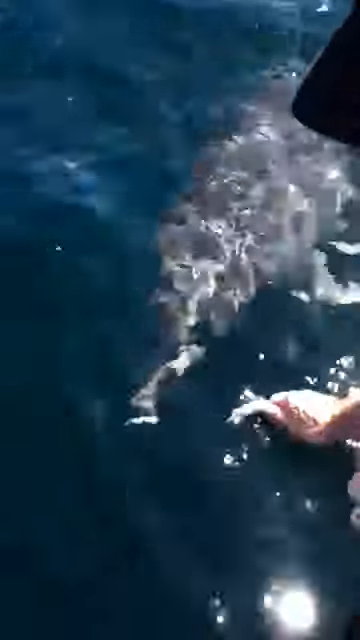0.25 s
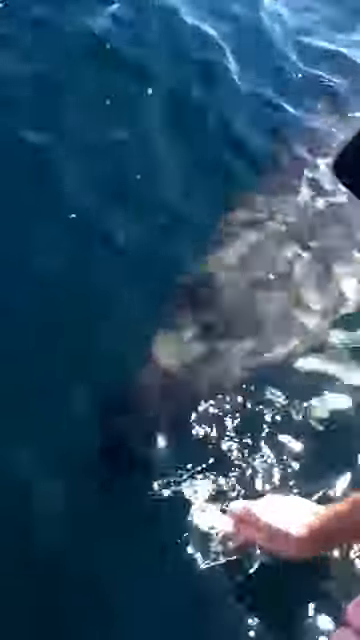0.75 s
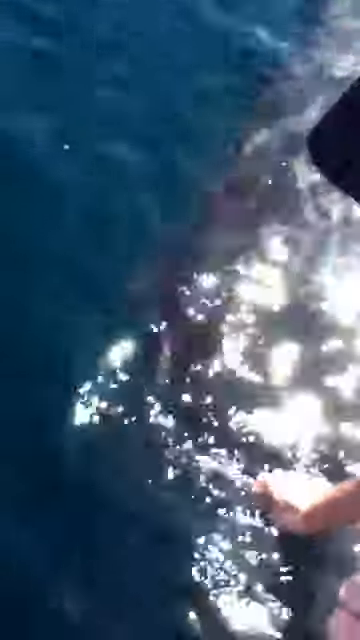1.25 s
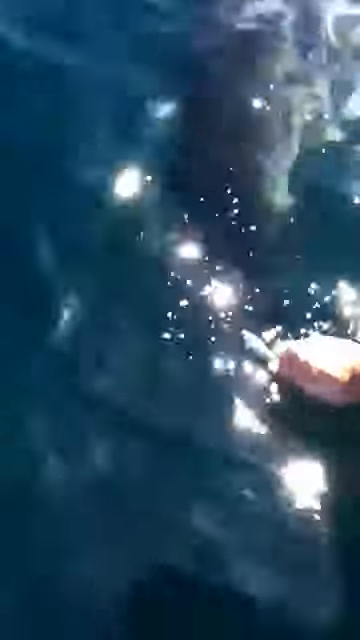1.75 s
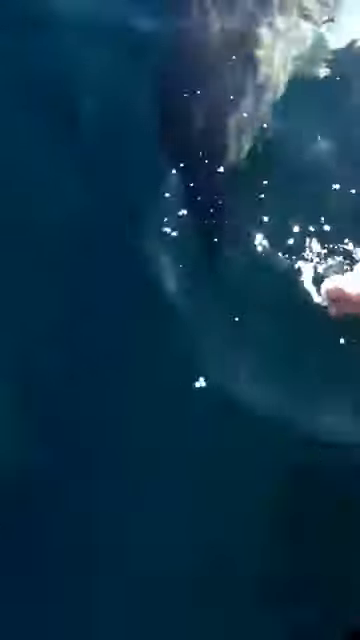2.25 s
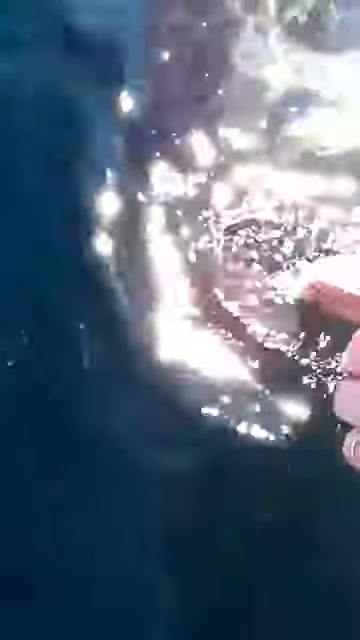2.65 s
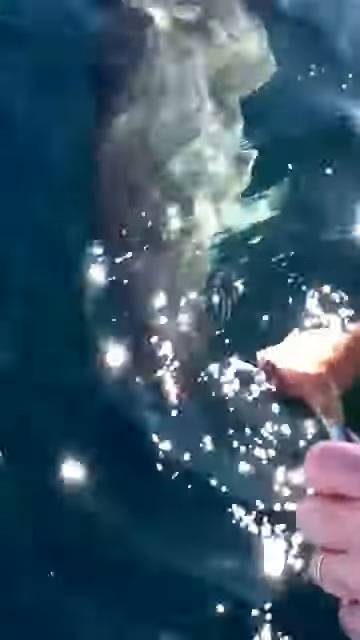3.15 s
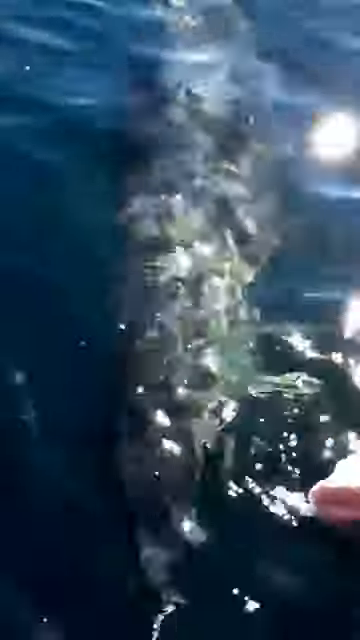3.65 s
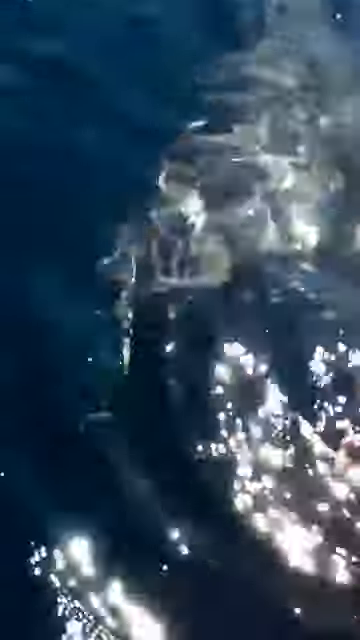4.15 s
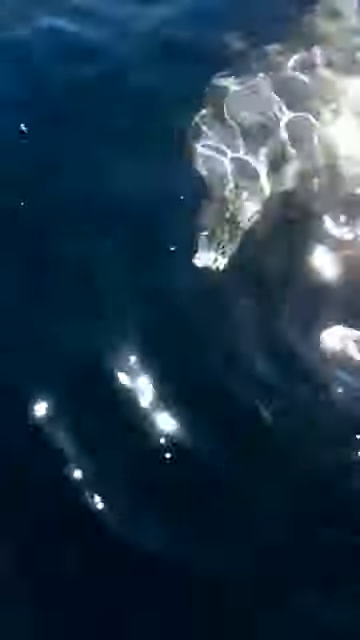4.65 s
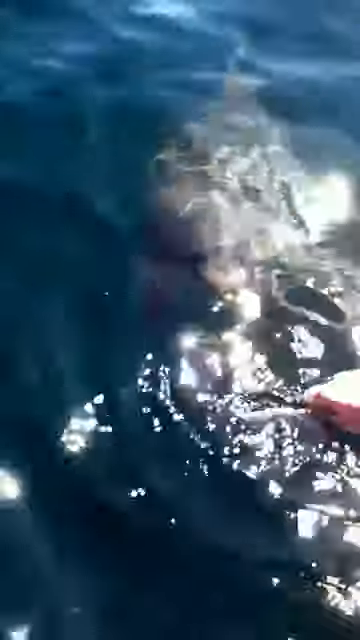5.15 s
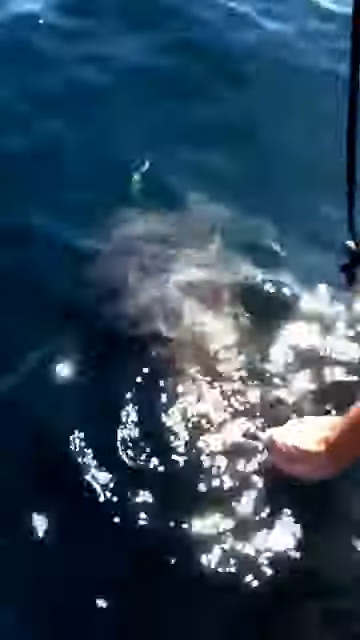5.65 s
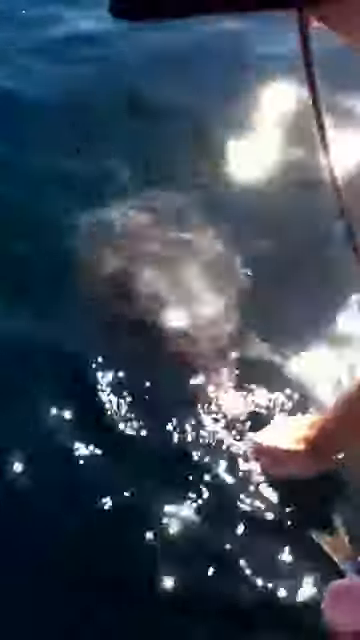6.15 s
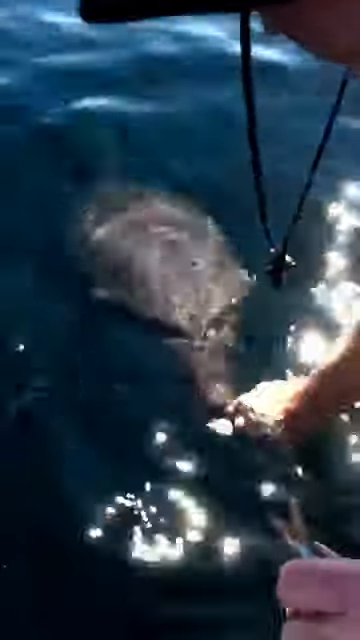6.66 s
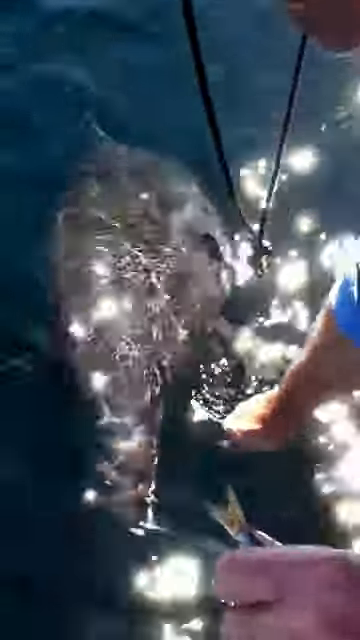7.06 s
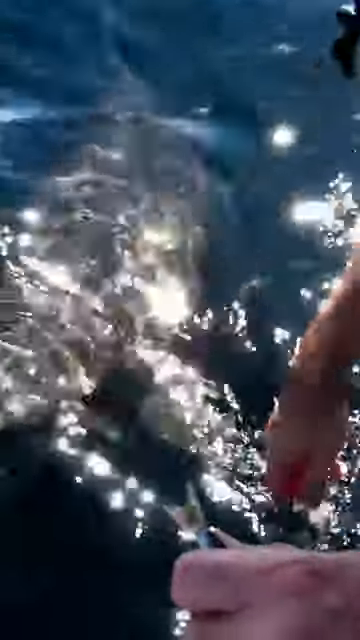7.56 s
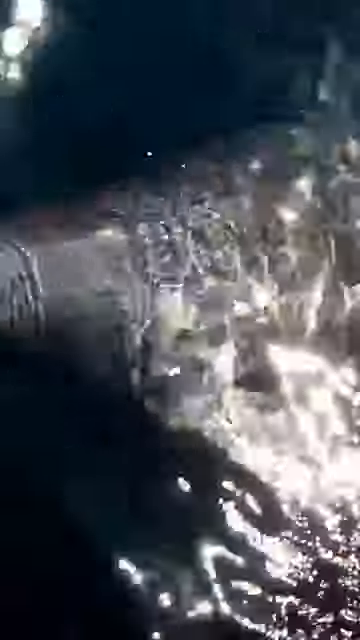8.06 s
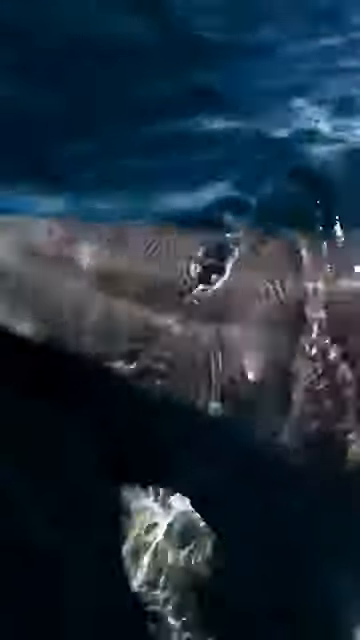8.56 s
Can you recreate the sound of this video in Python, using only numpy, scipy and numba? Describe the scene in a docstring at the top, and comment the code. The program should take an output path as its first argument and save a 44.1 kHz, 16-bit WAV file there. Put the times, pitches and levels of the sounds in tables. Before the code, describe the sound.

Small waves lap and slap softly against a boat hull, with gurgling bubbles, ticking drops and faint hiss in open air.

```python
"""Small waves against a boat

Waves lap the side of a boat, heard from a phone held over the rail. Slaps drive noise into air pockets
and damped hull modes; single bubbles are gliding tones amid froth, and drops tick as brief damped sines.
Swarms of random bubbles gurgle and crackle with each surge of water.
Shaped noise and a faint sine hiss softly underneath."""
import sys
import numpy as np
from scipy import signal
from scipy.fft import rfft, irfft
from scipy.io import wavfile
from scipy.ndimage import uniform_filter1d
from numba import njit

SR = 44100
rng = np.random.default_rng(int(sys.argv[2]) if len(sys.argv) > 2 else 0)


def put_to_file(sound):
    """Save the sound as 16-bit audio at rate SR, in the file named by the first command-line argument."""
    columns = np.atleast_2d(sound).T  # one column per channel
    safe = np.clip(columns, -1, 1)
    whole_steps = np.round(safe * 32767)
    wavfile.write(sys.argv[1], SR, whole_steps.astype(np.int16))


N = 388069
TIME = np.arange(N) / SR


def undb(db):
    """Decibel law: 20 dB is a tenfold amplitude."""
    return 10 ** (np.asarray(db) / 20)


def level(x, db):
    """Root-mean-square normalization to a level in dB."""
    return x * undb(db) / np.sqrt(np.mean(x ** 2))


def band(x, lo_hz, hi_hz):
    """Band-pass filtering: only the partials between two cutoffs pass freely."""
    sos = signal.butter(2, [lo_hz, min(hi_hz, 0.45 * SR)], "band", fs=SR, output="sos")
    return signal.sosfilt(sos, x)


def add(out, start_s, x):
    """Linear superposition: mix x into out from a given time."""
    i = int(start_s * SR)
    out[i:i + len(x)] += x[:N - i]


def burst(t60, attack_s):
    """Exponential decay: noise that rises quickly and falls by 60 dB in t60 seconds."""
    t = np.arange(int(SR * t60) + 64) / SR
    noise = rng.standard_normal(SR)[:len(t)]
    return noise * (1 - np.exp(-t / attack_s)) * 1000.0 ** (-t / t60) / 2


@njit
def rings(n, sr, start, hz, t60, rise, attack, size):
    """Damped free oscillation: sines that glide by `rise` octaves while they fade by 60 dB."""
    y = np.zeros(n)
    for k in range(len(start)):
        first, steps = int(start[k] * sr), int(t60[k] * sr) + 1
        w = 2 * np.pi * hz[k] / sr
        # a complex phasor turns and shrinks at each sample; glide quickens the turn
        turn = np.exp(1j * w - np.log(1000.0) / steps)
        glide = np.exp(1j * w * (2.0 ** rise[k] - 1) / steps)
        ease = np.exp(-1.0 / (attack[k] * sr + 1e-9))
        z, soft = size[k] + 0j, 1.0
        for i in range(max(first, 0), min(first + steps, n)):
            z, turn, soft = z * turn, turn * glide, soft * ease
            y[i] += (1 - soft) * z.imag
    return y


# air pocket and hull settings: levels against the slap, before filtering
POCKET_TAIL_DB, HULL_DB = 8, -37.5
# resonant modes of the hull: (frequency [Hz], level [dB], t60 [s])
HULL_MODES = [(166, -12, 0.28), (218, 1, 0.16), (328, -5.5, 0.15), (634, 10.5, 0.0093)]
# waves that slap the hull:
# (time [s], level [dB], air pocket frequency [Hz], t60 [s], splash level against the slap [dB])
HULL_SLAPS = [(0.004, -34, 393, 0.17, -17), (0.192, -38, 336, 0.64, -16), (0.521, -36, 218, 0.22, -14),
              (0.822, -43, 333, 0.35, -15), (1.388, -19, 176, 0.088, -8.5), (1.454, -25, 308, 0.17, -9),
              (1.997, -29, 295, 0.19, -21), (2.67, -35, 210, 0.48, -9), (3.186, -33.5, 220, 0.16, -10),
              (3.86, -35.5, 330, 0.93, -12), (4.286, -40, 210, 0.61, -24), (5.189, -50, 420, 0.93, -21),
              (5.669, -29, 185, 0.21, -15), (6.369, -31, 149, 0.3, -12), (6.446, -15.5, 220, 0.14, -13.5),
              (6.529, -28.5, 190, 0.27, -13), (6.869, -35.5, 251, 0.55, -15), (7.155, -35, 317, 0.046, -5),
              (7.247, -34, 212, 0.045, -12), (7.538, -31, 264, 0.17, -26), (8.211, -34, 295, 0.18, -8),
              (8.245, -46.5, 389, 0.9, -18)]


def slaps():
    """Impulsive excitation: a slap sets an air pocket murmuring, shakes the hull and throws a splash."""
    out, push = np.zeros(N), np.zeros(N)
    for start, db, hz, t60, splash_db in HULL_SLAPS:
        add(push, start, undb(db) * burst(t60, 0.00012))
        pocket = band(burst(t60, 0.02), hz / 1.02, hz * 1.43)
        add(out, start, undb(db + POCKET_TAIL_DB) * pocket)
        splash = band(burst(0.7 * t60, 0.00025), 230, 3170)
        add(out, start, undb(db + splash_db) * splash)
    # the push convolved with the hull's impulse response
    t = np.arange(SR // 4) / SR
    hull = sum(undb(db) * np.sin(2 * np.pi * hz * t) * 1000.0 ** (-t / t60) for hz, db, t60 in HULL_MODES)
    return out + undb(HULL_DB) * signal.fftconvolve(push, hull)[:N]


FADE_DB, FADE_POWER = 9, 0.79  # drop after one fade time, curve of the fade
FROTH_DB = 16  # froth against the tone, before filtering and the swell factors
CLEAN_SWELL_S = 0.0037  # a bubble that starts quicker than this has less froth
PUFF_CYCLES = 12  # a bubble that takes more cycles than this to swell is lost in its froth
# single bubbles and air pockets:
# (time [s], level before the puff loss [dB], frequency at the peak [Hz], swell [ms], fade [ms], glide [octaves])
SINGLE_BUBBLES = [(0.002, -37.5, 407, 0.64, 6.6, 0.07), (0.07, -53.5, 376, 8.8, 34, 0.041),
                  (0.188, -43, 314, 17, 28, 0.087), (0.216, -44, 474, 4, 10, -0.14),
                  (0.237, -41, 397, 9, 15, -0.39), (0.39, -42, 735, 2.4, 15.4, -0.018),
                  (0.425, -50.5, 1090, 13.4, 15, 1.25), (0.5, -45, 990, 4, 3.7, 0.12),
                  (0.511, -38.5, 1506, 2.3, 3.4, -0.53), (0.518, -42.5, 231, 9.3, 15, 0.0019),
                  (0.52, -36, 885, 12.4, 3.1, -0.06), (0.531, -40, 1250, 2.5, 11, 0.0),
                  (0.547, -44, 910, 9.5, 19, 0.31), (0.584, -45.5, 771, 9.6, 21, 0.35),
                  (0.602, -43, 667, 13, 14, 0.3), (0.638, -35.5, 262, 8.3, 20, 0.15),
                  (0.648, -33, 538, 46, 9.4, 0.57), (0.724, -39.5, 726, 2.6, 6.9, 0.21),
                  (0.749, -44, 700, 2.5, 8.2, -0.14), (0.75, -49, 240, 5.4, 7.3, -0.24),
                  (0.81, -49, 727, 5.4, 9.1, 0.039), (0.82, -50, 347, 5, 11, -0.062),
                  (0.834, -42, 1330, 4.6, 4.3, -0.25), (0.854, -43, 2490, 0.8, 6, -0.025),
                  (0.948, -48.0, 511, 4.4, 18.5, 0.17), (0.959, -39, 985, 16, 3.6, -0.27),
                  (0.96, -43, 1826, 2.9, 3.9, 0.09), (0.969, -45, 2100, 6.0, 8.5, -0.045),
                  (0.973, -45.5, 526, 12, 8.9, 0.085), (0.993, -42, 2080, 4.0, 3.0, 0.17),
                  (0.996, -34.5, 1184, 2.5, 2, 0.12), (1.002, -40.5, 1314, 8.6, 9.1, 0.2),
                  (1.187, -46, 2010, 1.5, 3, 0), (1.193, -42, 2160, 2, 3.7, 0),
                  (1.203, -27, 2035, 0.9, 3, -0.059), (1.215, -44.5, 640, 2, 8.9, -0.0072),
                  (1.27, -54, 1100, 6, 6.4, -0.062), (1.321, -51, 2560, 3.5, 5.5, 0.17),
                  (1.387, -27.5, 345, 4, 14, -0.026), (1.387, -21.5, 184, 4, 11, -0.15),
                  (1.389, -44, 1740, 4.3, 5.9, 0.087), (1.395, -34, 716, 7.3, 6.7, -0.18),
                  (1.407, -54, 1430, 2.5, 6.7, 0.16), (1.412, -51, 720, 12, 9.2, 0.022),
                  (1.412, -25, 242, 11.7, 3.5, -0.17), (1.438, -41, 1080, 2.1, 4.6, -0.15),
                  (1.437, -33, 275, 4.2, 9, -0.2), (1.438, -46, 457, 3, 8, 0),
                  (1.455, -30.5, 293, 17, 11.1, 0.036), (1.53, -40.5, 169, 11, 25, -0.26),
                  (1.543, -41.5, 383, 16, 24, -0.2), (1.564, -46.5, 740, 8.1, 3.5, -0.13),
                  (1.596, -49, 1250, 2.5, 12, 0), (1.66, -53, 802, 10, 22, -0.11),
                  (1.702, -50.5, 1290, 5.1, 13, 0.15), (1.706, -51, 1700, 6, 6.9, 0.012),
                  (1.825, -48, 745, 17, 3, 0.47), (1.996, -31.5, 299, 11, 19, -0.18),
                  (2.034, -37, 314, 8.5, 9.2, -0.54), (2.061, -44, 275, 15.0, 6.8, -0.013),
                  (2.09, -45.5, 293, 13, 21, 0), (2.14, -44.5, 306, 5.4, 7.9, 0.09),
                  (2.146, -39.5, 983, 12, 3.3, -0.087), (2.165, -43.5, 870, 11.6, 8.6, 0.37),
                  (2.411, -39.5, 1875, 1.6, 6.1, -0.016), (2.44, -49, 1660, 8.7, 1.1, -0.29),
                  (2.611, -46, 1330, 2.8, 6, -0.083), (2.651, -38, 570, 3.5, 11, 0.036),
                  (2.66, -37, 641, 16, 13, 0.022), (2.664, -46, 241, 19, 41, 0.27),
                  (2.68, -36, 886, 6.6, 10, 0.6), (2.704, -22.5, 920, 0.56, 3.7, -0.081),
                  (2.713, -36, 1230, 16, 2.6, 0.11), (2.764, -35.5, 641, 5.6, 8.9, 0.043),
                  (2.78, -40, 1630, 3, 2.1, 0.47), (2.813, -47, 1000, 2.5, 8.9, 0),
                  (2.873, -29, 542, 2, 4.8, -0.06), (2.952, -37.5, 806, 2.4, 5.2, 0.16),
                  (3.017, -51, 940, 8.4, 16, 0.29), (3.093, -46, 2770, 0.8, 9.6, 0.046),
                  (3.148, -54, 1900, 2.5, 8, 0.07), (3.179, -58, 990, 1.8, 3.3, 0.06),
                  (3.187, -40, 243, 3.8, 32, -0.64), (3.238, -54, 238, 9, 7.7, -0.29),
                  (3.291, -36.5, 631, 4.2, 16, 0.058), (3.296, -41.5, 194, 13, 14, 0.25),
                  (3.31, -48.5, 410, 10, 38, 0.1), (3.321, -46, 647, 7.8, 20, -0.028),
                  (3.352, -52, 1740, 4.9, 11, 0.06), (3.562, -46, 780, 5.5, 20, -0.05),
                  (3.817, -44, 860, 7.9, 3.6, 0.17), (3.832, -42, 338, 43, 23.8, -0.13),
                  (3.832, -45, 442, 17, 15, -0.12), (3.878, -45, 1674, 3.9, 2.8, -0.026),
                  (3.917, -43, 1184, 4.2, 5.5, -0.08), (3.948, -42, 772, 15, 10.3, -0.06),
                  (3.957, -49, 2640, 6.7, 3.1, -0.12), (3.987, -36, 770, 10.7, 7.2, -0.072),
                  (4.016, -41, 780, 6.8, 7.3, 0.06), (4.04, -44, 650, 14, 37, -0.28),
                  (4.073, -44.5, 786, 4.5, 7.9, 0.2), (4.1, -35, 597, 2.4, 11.7, -0.06),
                  (4.194, -46, 598, 2.7, 21, -0.14), (4.273, -46.0, 210, 37, 16, -0.12),
                  (4.274, -43, 672, 9.1, 16, -0.56), (4.46, -44.5, 2010, 1.9, 4.4, 0.13),
                  (4.736, -48.5, 1720, 1.7, 12, 0.13), (4.745, -48, 1580, 9.5, 2.7, -0.06),
                  (4.802, -43, 1606, 1.3, 5.5, -0.0049), (4.944, -51, 1450, 3.8, 8.6, 0.19),
                  (4.996, -44, 1214, 1.9, 6.6, -0.038), (4.998, -50, 1480, 4, 19, 0.074),
                  (5.078, -44.5, 1603, 1.1, 3.8, 0.075), (5.149, -42.5, 785, 4.1, 10.6, 0.056),
                  (5.151, -45, 536, 2.5, 7.5, -0.06), (5.183, -42, 395, 25, 29, 0.017),
                  (5.191, -50, 704, 7.6, 3.9, -0.26), (5.396, -32.5, 2640, 1.3, 2.5, 0.023),
                  (5.49, -50, 1910, 10, 16, -0.2), (5.541, -51, 572, 3.4, 17.6, -0.084),
                  (5.622, -36, 934, 2.1, 2.9, -0.06), (5.625, -43, 1370, 3.7, 5.1, 0.0088),
                  (5.63, -39.5, 570, 6.4, 5.9, -0.19), (5.646, -43, 515, 24, 4.5, -0.018),
                  (5.662, -53, 1420, 0.9, 11.5, -0.06), (5.666, -50, 2368, 0.8, 7.9, 0.052),
                  (5.667, -46, 870, 15.0, 16.9, 0.016), (5.676, -52.0, 2941, 3.2, 7.7, 0.082),
                  (5.68, -42.0, 368, 3, 18, 0.45), (5.697, -42, 471, 16.6, 19, 0.49),
                  (5.704, -36.5, 993, 8.4, 17, -0.041), (5.72, -44, 780, 11.2, 10.3, 0.21),
                  (5.749, -50.0, 1920, 2.6, 6.0, 0.0058), (5.755, -45, 775, 8.3, 5.2, 0.22),
                  (5.76, -45, 479, 4.9, 29, -0.33), (5.768, -39, 902, 15, 12, 0.0),
                  (5.812, -47, 718, 4.5, 12, 0), (5.866, -46.0, 593, 3.5, 11, 0.097),
                  (5.892, -50, 2700, 0.73, 5.2, -0.19), (5.937, -51.0, 2268, 3.0, 3.0, -0.12),
                  (5.95, -39.5, 560, 11, 9.0, 0.067), (5.953, -47, 2230, 7.0, 4.1, -0.013),
                  (5.979, -48, 2172, 3.0, 3.0, -0.16), (6.007, -53, 2368, 7.9, 7.7, 0.24),
                  (6.026, -33.5, 652, 1.8, 12.5, 0.022), (6.072, -43.5, 766, 2.8, 3.3, -0.12),
                  (6.103, -49, 1390, 6.9, 7.7, -0.23), (6.172, -47, 883, 8.9, 13, 0.12),
                  (6.192, -45, 2900, 1.7, 5.4, -0.28), (6.236, -36.5, 965, 1.8, 5.4, 0.12),
                  (6.258, -48, 1570, 3.8, 3.8, -0.025), (6.298, -52, 960, 3, 5, 0.14),
                  (6.372, -43, 188, 6, 14, -0.21), (6.372, -39, 2190, 1.5, 3, -0.11),
                  (6.403, -48, 2172, 0.8, 6.1, 0.13), (6.435, -31, 767, 8, 5.1, -0.046),
                  (6.438, -31, 1130, 8.5, 4.6, 0.075), (6.441, -29, 423, 6.2, 5.9, -0.79),
                  (6.445, -22.5, 215, 7.8, 24.4, 0.17), (6.447, -59, 2530, 5.2, 0.8, -0.06),
                  (6.46, -49, 667, 9.2, 15, -0.26), (6.494, -39, 232, 12, 13, -0.26),
                  (6.521, -41, 209, 11, 12, -0.76), (6.525, -39.5, 878, 14.6, 21, 0.13),
                  (6.533, -46, 1510, 12, 6.4, 0.1), (6.553, -42, 674, 12.5, 26, 0.048),
                  (6.704, -57, 1150, 4, 8, -0.1), (6.731, -47, 595, 4, 8, 0.0036),
                  (6.802, -45, 1070, 15, 9.6, -0.14), (6.86, -46, 1030, 0.8, 3.4, 0.068),
                  (6.868, -34, 258.8, 15.5, 17, 0.045), (6.9, -52, 275, 6.3, 14, 0),
                  (6.935, -53.5, 1390, 5, 12, 0), (6.945, -48, 258, 7.2, 17, -0.31),
                  (6.957, -48, 2130, 3.3, 11.6, 0), (6.978, -55, 600, 2, 3.6, 0),
                  (6.982, -45.5, 240, 5, 10, 0.097), (7.032, -49, 447, 3, 9.2, -0.099),
                  (7.035, -37.5, 871, 14, 5.5, -0.073), (7.056, -46, 813, 3.6, 6.8, -0.11),
                  (7.061, -48.5, 2450, 2.0, 6, 0.0), (7.105, -47.5, 1344, 15, 15.2, -0.15),
                  (7.155, -51, 1510, 1.2, 2.7, 0.0), (7.156, -46.5, 300, 2.7, 5, 0.18),
                  (7.248, -45.5, 222, 4.3, 4.5, -0.087), (7.53, -47.5, 760, 6.4, 8.3, 0.43),
                  (7.539, -39.5, 262, 5.4, 7.9, -0.031), (7.54, -53.0, 980, 9.8, 8.7, -0.28),
                  (7.56, -40.5, 184, 7.5, 16, -0.44), (7.581, -46.5, 176.4, 25, 69, 0.6),
                  (7.618, -45, 1420, 3.5, 4.1, 0.4), (7.619, -46.5, 905, 2, 25, -0.45),
                  (7.627, -43.5, 543, 8, 6.8, 0.06), (7.699, -49, 1310, 3.6, 6.7, 0.0),
                  (7.78, -49.5, 2230, 10, 8.2, 0.075), (7.846, -44.5, 1390, 2.5, 5.4, -0.13),
                  (7.93, -47, 1395, 2.5, 12, -0.099), (8.091, -49, 623, 3.6, 13, 0.028),
                  (8.146, -44.5, 1290, 23, 5.3, 0.19), (8.172, -52, 1063, 4, 19, 0),
                  (8.204, -52, 1540, 5.5, 2.7, -0.29), (8.208, -40.5, 303, 7.7, 16, -0.28),
                  (8.213, -42.5, 446, 4.0, 7.6, -0.058), (8.228, -50, 400, 4, 9.9, 0.45),
                  (8.245, -41, 411.5, 4.2, 20, 0.024), (8.288, -35.5, 1785, 0.88, 4.5, -0.04),
                  (8.33, -48.5, 1990, 0.8, 6.5, -0.04), (8.37, -46.5, 5350, 1.8, 5.3, 0),
                  (8.38, -60, 5120, 5.3, 8.1, -0.03), (8.478, -25, 4020, 1.8, 1.54, 0.03),
                  (8.595, -51, 2320, 4.4, 7.3, 0.12), (8.61, -52, 2246, 7.9, 7.2, 0.056)]


def bubbles():
    """Volume resonance of trapped air: a tone swells, glides and fades amid a froth of neighbours."""
    out = np.zeros(N)
    for start, db, hz, swell_ms, fade_ms, glide in SINGLE_BUBBLES:
        swell, fade = max(swell_ms, 0.3) / 1000, max(fade_ms, 0.5) / 1000
        t = np.arange(int((swell + 6 * fade) * SR)) / SR - swell  # zero at the peak
        fading = undb(-FADE_DB * np.abs(t / fade) ** FADE_POWER)
        shape = np.where(t < 0, np.cos(np.pi / 2 * t / swell), fading)
        pitch = hz * 2 ** (glide * np.minimum(t, 2 * fade) / (swell + fade))
        tone = shape * np.sin(2 * np.pi * np.cumsum(pitch) / SR)
        # slow swells weaken the tone and strengthen the froth
        puff = np.hypot(1, swell * hz / PUFF_CYCLES)
        add(out, start, undb(db) / puff * tone)
        froth = band(burst(swell + 10 * fade, swell), hz / 1.3, hz * 1.283)
        froth_gain = undb(db + FROTH_DB) * min(swell / CLEAN_SWELL_S, 1) * puff ** 0.5
        add(out, start, froth_gain * froth)
    return out


SNAP_T60_S, SNAP_HZ = 0.00047, 9500
# drops that strike the surface:
# (time [s], reference level [dB], centre frequency [Hz], air above 8 kHz against it [dB], ring t60 [ms])
DROP_TICKS = [(0.338, -37, 6700, -29, 7.8), (.373, -37.5, 2860, -24, 14), (0.435, -44, 5540, -15, 13),
              (0.5096, -34, 3100, -15, 14), (0.536, -41, 5670, -10, 12), (0.5486, -29.5, 5970, -15, 8),
              (.5594, -28, 4060, -15, 7), (.6374, -40, 8400, -15, 12), (0.785, -26, 4400, -4.5, 7),
              (0.84, -30, 6100, -20, 9), (0.9323, -33.5, 3600, -14, 7), (0.968, -36.5, 3460, -13, 15),
              (1.0118, -29, 8800, -8, 16), (1.025, -31, 8400, -12, 9), (1.085, -30.5, 4650, -22, 9.7),
              (1.134, -32.5, 8560, -12, 9.6), (1.1749, -32, 2700, -15, 15), (1.188, -30, 4500, -15, 6),
              (1.2041, -28, 8100, -14, 12), (1.212, -24.5, 4800, -4, 6.3), (1.289, -29, 4830, -6, 6.6),
              (1.448, -25, 4550, -32, 9.8), (1.4526, -27, 3060, -0.5, 20), (1.6796, -44.5, 7840, -13, 11),
              (1.726, -48, 11300, -13, 12), (2.399, -38.5, 4260, -3, 14), (2.437, -29, 2850, -3, 9),
              (2.785, -35.5, 5020, -18, 17), (2.8747, -10, 5950, -20, 9), (2.8744, -9, 3720, -16, 8),
              (2.88, -21, 2210, -25, 14), (2.9206, -37, 9300, -9, 7.3), (3.18, -32, 1000, -20, 13),
              (3.182, -38.5, 3260, -2, 11), (3.292, -42, 9450, -11, 13), (3.386, -44, 11000, -15, 12),
              (3.929, -42, 2640, -17, 14), (4.317, -41, 5000, -6, 12), (4.9473, -41, 5670, -3, 11),
              (4.9955, -45, 5270, -10, 12), (5.078, -29.5, 4560, -20, 6), (5.08, -27, 5400, 1.5, 8.1),
              (5.1338, -31, 9500, -1, 5), (5.1378, -26, 4000, -3, 5.4), (5.239, -42, 8200, -8, 7.1),
              (5.396, -36, 2740, -15, 6), (5.4045, -29, 6150, 7.5, 5.7), (5.665, -41, 2550, -12, 14),
              (5.6836, -45, 5700, -4, 12), (5.704, -36, 3640, -23, 23), (5.7733, -42, 3700, -7, 14),
              (5.844, -45, 3240, -5, 12), (5.956, -39, 8460, -10, 15), (6.0343, -40, 5830, -19, 12),
              (6.1847, -42, 2900, -19, 18), (6.314, -30.5, 7400, -19, 11), (6.4035, -34.5, 2400, -5, 13),
              (6.437, -35.5, 3660, -13, 15), (6.861, -32, 900, -25, 14), (7.156, -55, 1880, -20, 14),
              (7.247, -43, 1610, -26, 14), (7.7444, -38.5, 4030, -22, 10), (7.7862, -35, 4040, 1, 11),
              (7.829, -37.5, 5700, -19, 12), (7.8784, -37, 3080, -15, 14), (7.881, -37, 8460, -16, 10),
              (7.927, -36.5, 4870, -14, 11), (7.9456, -31.5, 6450, -19, 11), (8.162, -44.5, 3770, -25, 50),
              (8.2884, -32, 3640, 0.5, 4.4), (8.3683, -39, 5140, -18, 12), (8.425, -42, 4000, -15, 8),
              (8.4778, -20, 4030, -5, 4.6), (8.5908, -49, 2435, -20, 14)]


def ticks():
    """Impact and cavity ringing: a drop snaps, rings a tiny crater amid a crack, and spits treble."""
    start, db, hz, air_db, t60_ms = np.transpose(DROP_TICKS)
    same, t60 = np.ones(len(start)), np.maximum(t60_ms, 1) / 1000
    crater = rings(N, float(SR), start, hz, t60, 0.015 * same, 0.00027 * same, undb(db - 6))
    snap = rings(N, float(SR), start, SNAP_HZ * same, SNAP_T60_S * same, 0 * same, 0.00002 * same,
                 undb(db + air_db + 6))
    out, air = crater + snap, np.zeros(N)
    for k in range(len(start)):
        crack = burst(1.68 * t60[k], 0.00035)
        add(out, start[k], undb(db[k] + 2) * band(crack, hz[k] / 1.64, hz[k] * 1.41))
        add(air, start[k], undb(db[k] + air_db[k] - 9) * crack)
    return out + band(air, 8000, 10600)


CALM_DB = (-73.5, -75, -73)  # slosh, gurgle and fizz gains between surges
SPRAY_DB, CRACKLE_DB = -4.5, -9.5  # gains against the fizz
CALM_SPRAY_DB = -72.5  # spray gain between surges
SPATTER_FOLLOWS_GURGLE, SPATTER_DB = 0.25, -2  # share 0-1; gain against the blend of gurgle and fizz


def wash():
    """Incoherent summation: swarms from large pockets to mist ride on the surges in clusters."""
    low, mid, fizz = surges()
    calm = undb(CALM_DB)
    slosh = swarm(count=2400, lo_hz=135, hi_hz=419, cycles=13.8, spread_db=2.52, rise=0.13, tilt_db=1)
    gurgle = swarm(count=8000, lo_hz=397.3, hi_hz=1644, cycles=47, spread_db=2.5, rise=0.17, tilt_db=2)
    spatter = swarm(count=18000, lo_hz=1396, hi_hz=5530, cycles=53, spread_db=1.92, rise=0.28, tilt_db=2)
    spray = swarm(count=36000, lo_hz=5303, hi_hz=14920, cycles=113, spread_db=2.5, rise=0.11, tilt_db=2.5)
    # the biggest droplets land as dry, broad clicks
    crackle = swarm(count=1500, lo_hz=2490, hi_hz=12200, cycles=12, spread_db=3, rise=0.05, tilt_db=-2)
    # bubbles come in gulps; droplets fall in bunches, and the mist follows them
    gulp = undb(0.56 * walk(12))
    bunch = undb(walk(22) + 1.49 * walk(60))
    # independent sounds add in power
    mist = np.hypot(undb(SPRAY_DB) * fizz, undb(CALM_SPRAY_DB))
    low, mid, top = np.hypot(low, calm[0]), np.hypot(mid, calm[1]), np.hypot(fizz, calm[2])
    # heavy water thickens the spatter; surges that are mostly spray crackle instead
    heavy = (mid / top) ** SPATTER_FOLLOWS_GURGLE
    droplets = bunch * (undb(SPATTER_DB) * top * heavy * spatter + mist * spray)
    clicks = undb(CRACKLE_DB) * fizz / heavy ** 2 * crackle
    return low * slosh + mid * gulp * gurgle + droplets + clicks


def swarm(count, lo_hz, hi_hz, cycles, spread_db, rise, tilt_db):
    """Resonance scaling: random bubbles, small ones ringing high and briefly, at an rms of 1."""
    when, where, rarity, life = rng.random((count, 4)).T
    hz = lo_hz * (hi_hz / lo_hz) ** where
    # a few bubbles are much louder; tilt is in dB per octave
    size = undb(-spread_db * np.log(1 - rarity) + tilt_db * np.log2(hz / lo_hz))
    t60 = cycles * (0.5 + life) / hz
    return level(rings(N, float(SR), when * N / SR, hz, t60, rise * life, 0.45 / hz, size), 0)


def walk(rate):
    """Random modulation: levels drawn `rate` times a second, joined by straight ramps."""
    k = int(SR / rate)
    steps = np.repeat(rng.standard_normal(N // k + 1), k)
    return 1.9 * uniform_filter1d(steps, k)[:N]


SURGE_RISE_DB_PER_S, SURGE_ATTACK_S = 707, 0.0093  # attack: delay from the listed time to the peak
DRAIN_DB_PER_S = (117, 177, 122)  # how fast slosh, gurgle and fizz die away after the hold
# surges of water along the hull: (time [s], hold [s], slosh [dB], gurgle [dB], fizz [dB])
WATER_SURGES = [(0, 0.0063, -46, -62.5, -64), (0.193, 0.072, -58.5, -61.5, -71),
                (0.497, 0.061, -57.5, -53.5, -54), (0.612, 0.16, -55, -53, -59),
                (0.821, 0.033, -52.5, -55.5, -54), (0.934, 0.095, -63, -55.5, -54),
                (1.07, 0.26, -62.5, -62, -60.5), (1.385, 0.0091, -46, -44, -57.5),
                (1.456, 0.18, -51.5, -58.5, -69), (1.808, 0.057, -65, -60, -78.5),
                (1.982, 0.093, -57, -75, -69), (2.139, 0.0088, -59, -56, -77),
                (2.412, 0.031, -67, -58, -67), (2.607, 0.095, -63, -56.5, -58),
                (2.732, 0.13, -58.5, -50.5, -61), (2.99, 0.13, -69, -62, -63),
                (3.174, 0.089, -50, -67.5, -69), (3.274, 0.064, -58, -74, -65),
                (3.802, 0.16, -57.5, -53.5, -61), (4.033, 0.15, -56.5, -59, -67.5),
                (4.235, 0.1, -55.5, -55.5, -62), (4.521, 0.31, -59.5, -60, -68),
                (4.91, 0.14, -68.5, -66, -66.5), (5.13, 0.034, -61.5, -75, -69),
                (5.471, 0.14, -62, -58, -67), (5.61, 0.031, -61, -58, -64),
                (5.661, 0.14, -48.5, -49.5, -53.5), (5.837, 0.15, -55.5, -52.5, -56.5),
                (5.999, 0.14, -54.5, -55, -58.5), (6.166, 0.17, -58, -56.5, -59),
                (6.428, 0.0055, -41, -40, -55.5), (6.513, 0.14, -58.5, -61.5, -61.5),
                (6.672, 0.17, -61.5, -59.5, -73), (6.935, 0.024, -57, -62, -66),
                (7.025, 0.049, -56, -59, -65.5), (7.524, 0.0091, -59, -55, -64.5),
                (7.609, 0.079, -63, -59, -61), (7.746, 0.12, -57, -57, -61.5),
                (7.99, 0.24, -67, -63.5, -66), (8.19, 0.029, -56.5, -56.5, -74),
                (8.587, 0.012, -83, -75, -67)]


def surges():
    """Energy envelopes: slosh, gurgle and fizz gains swell, hold and drain, overlaps adding in power."""
    t = TIME[::64]
    start, hold, *peaks_db = np.transpose(WATER_SURGES)[:, :, None]
    since = t - start - SURGE_ATTACK_S
    swell_db = SURGE_RISE_DB_PER_S * np.minimum(since, 0)
    gains = []
    for peak_db, drain in zip(peaks_db, DRAIN_DB_PER_S):
        drain_db = drain * np.maximum(since - hold, 0)
        power = np.sum(undb(peak_db + swell_db - drain_db) ** 2, axis=0)
        gains.append(np.interp(TIME, t, np.sqrt(power)))
    return gains


HISS_DB = -64.5  # rms level
WHINE_HZ, WHINE_DB = 15000, -88  # amplitude of the sine
# shape of the noise spectrum: (frequency [Hz], relative level per Hz [dB])
HISS_SPECTRUM = [(18, -53), (32, -7), (53, -14.5), (137, -2.5), (244, 3), (496, -11.5), (816, -3),
                 (1120, -10.5), (2330, -11), (3110, -14.5), (10400, -17), (13500, -16.5), (15800, -16.5)]


def hiss():
    """Spectral shaping: white noise filtered to microphone hiss and far sea, with a faint steady whine."""
    hz, db = np.transpose(HISS_SPECTRUM)
    f = np.maximum(np.arange(N // 2 + 1) * SR / N, 1)
    shape = undb(np.interp(np.log(f), np.log(hz), db))
    noise = irfft(rfft(rng.standard_normal(N)) * shape, N)
    whine = undb(WHINE_DB) * np.sin(2 * np.pi * WHINE_HZ * TIME)
    return level(noise, HISS_DB) + whine


def scene():
    """Superposition in the open air: water at the hull over the hiss, without reverberation."""
    water = slaps() + bubbles() + ticks() + wash()
    # the microphone port drops the deepest bass
    water = signal.sosfilt(signal.butter(4, 105, "high", fs=SR, output="sos"), water)
    return (water + hiss())[None]


def record(dry):
    """Band limitation: the phone cuts the top steeply above 15850 Hz."""
    return signal.sosfilt(signal.ellip(10, 0.2, 70, 15850, fs=SR, output="sos"), dry)


dry = scene()
out = record(dry)
put_to_file(out)
```